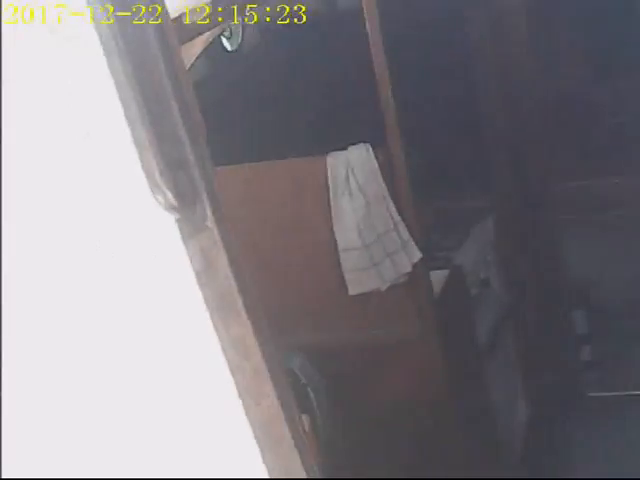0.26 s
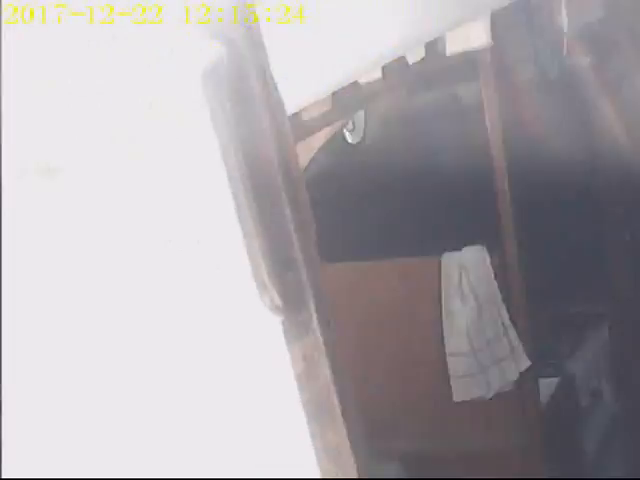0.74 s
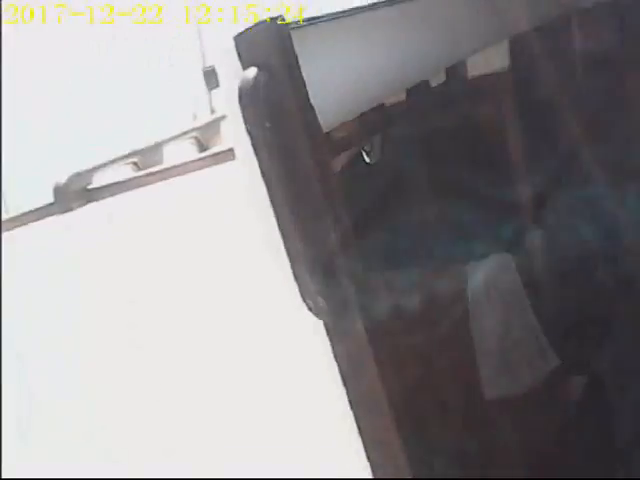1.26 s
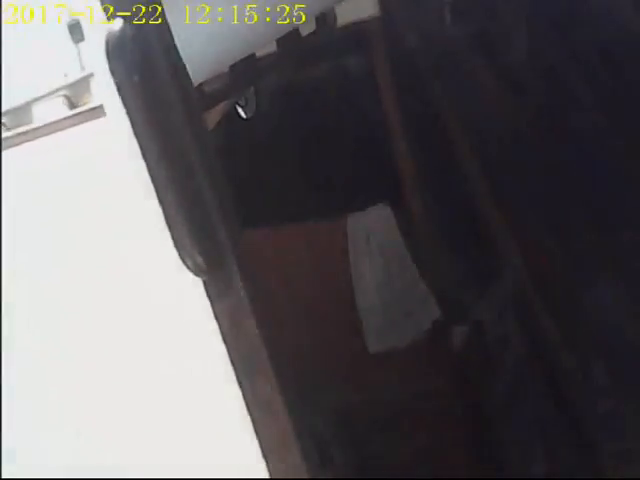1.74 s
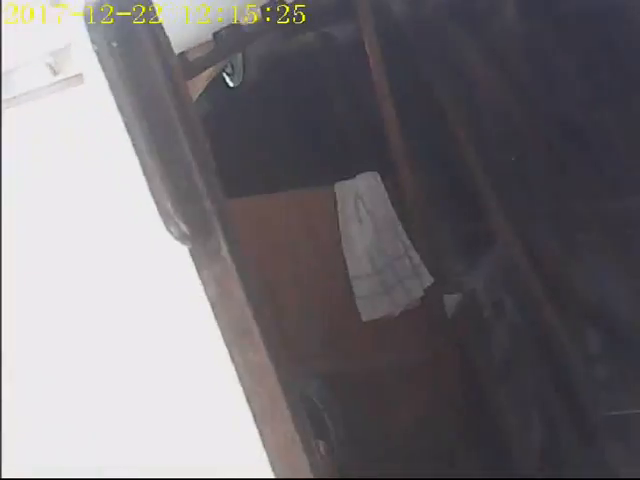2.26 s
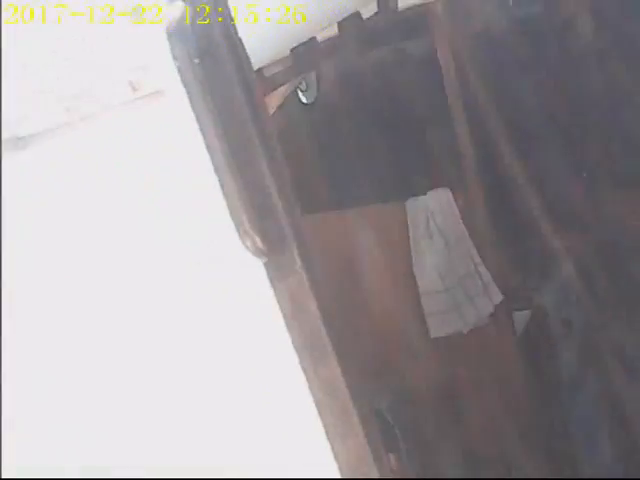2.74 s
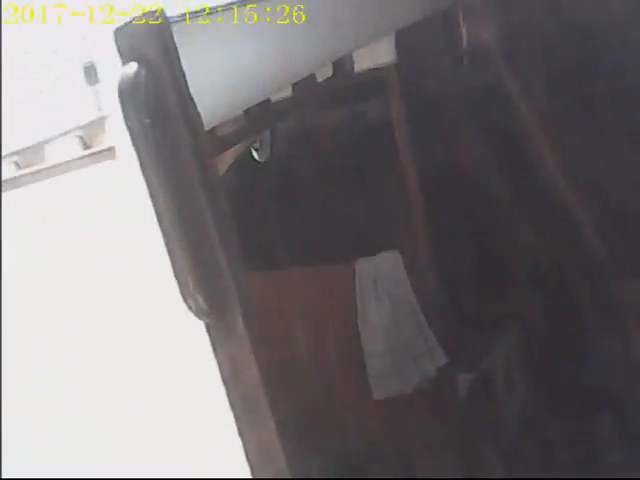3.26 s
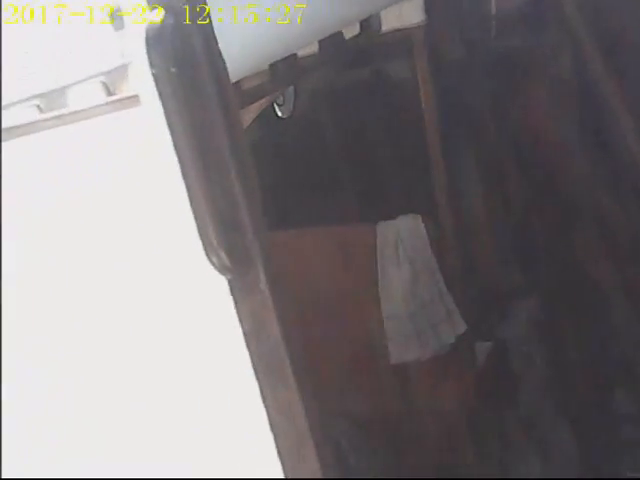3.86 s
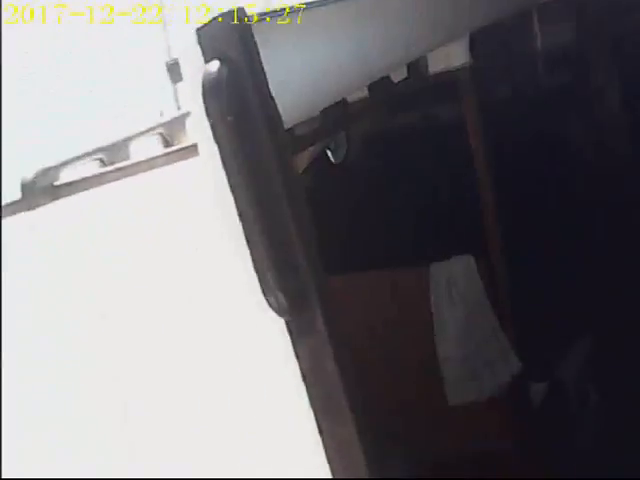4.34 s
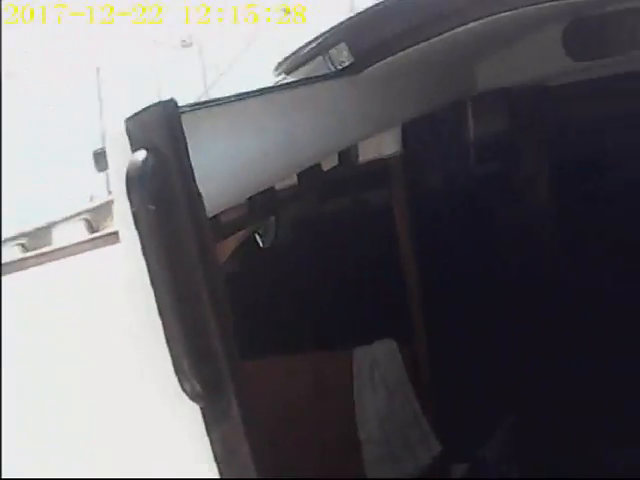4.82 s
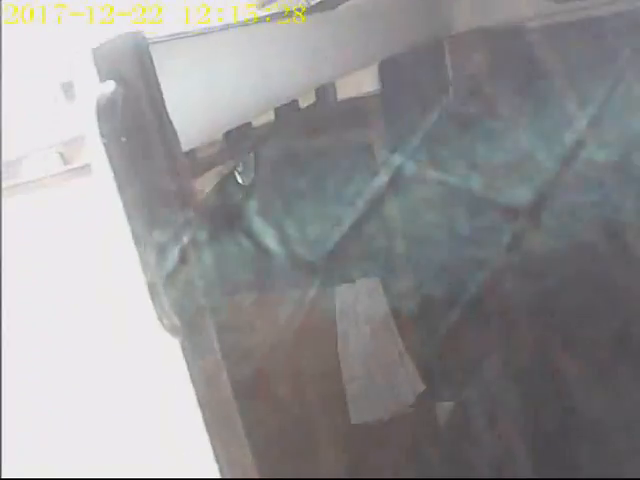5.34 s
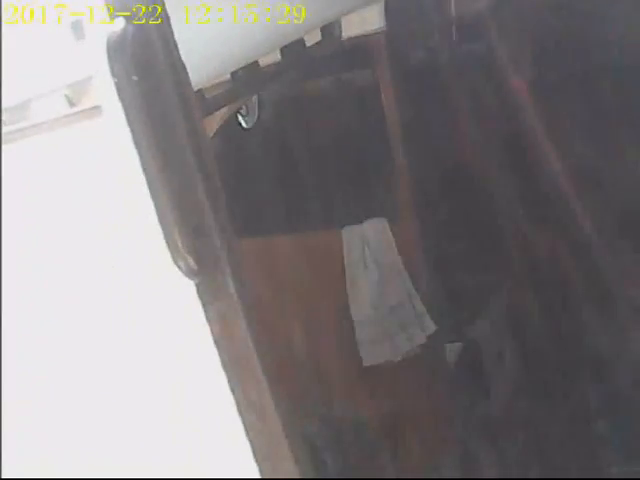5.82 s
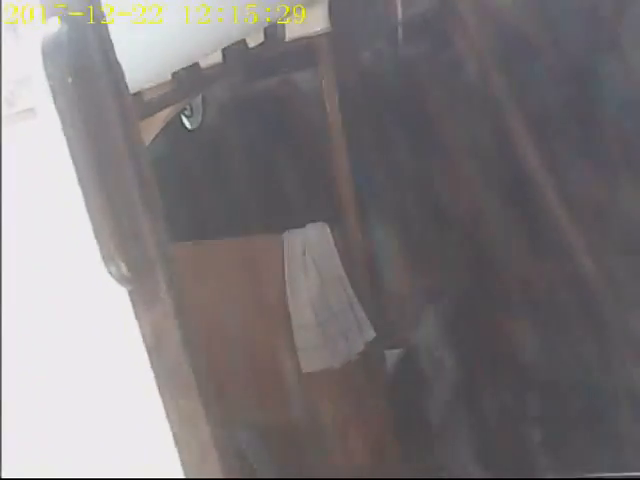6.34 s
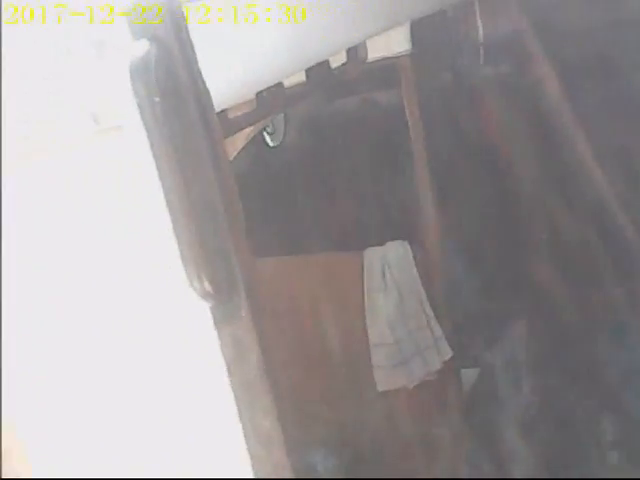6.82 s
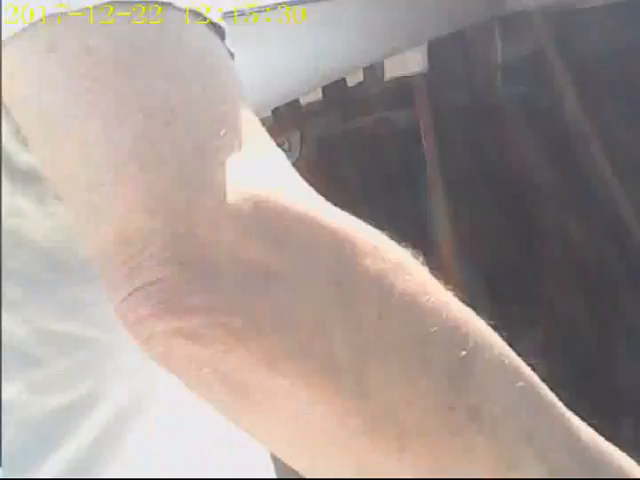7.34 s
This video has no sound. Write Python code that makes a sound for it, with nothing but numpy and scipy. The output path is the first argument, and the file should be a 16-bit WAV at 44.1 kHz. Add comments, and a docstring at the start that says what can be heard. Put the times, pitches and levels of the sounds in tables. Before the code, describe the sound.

A small boat diesel chugs steadily with hull hum and metallic rattle, light wind on the microphone, then hard buffeting gusts and brushing clothes near the end.

```python
"""A sailing boat's small diesel chugs along at slow speed, heard from the cockpit by a cheap camera.
The hull hums on multiples of the firing rate; noise shaped by each cycle gives clatter and metal rattle.
Light wind touches the microphone, then buffets it hard as someone moves in close: filtered noise in
gusts, with pressure bumps for the largest eddies. Clothes brush and a fitting clicks now and then, as
short noise bursts over faint hiss. The camera's low sample rate mirrors the sound into the treble."""
import sys
import numpy as np
from scipy import signal
from scipy.fft import rfft, irfft, next_fast_len
from scipy.io import wavfile

SR = 44100
rng = np.random.default_rng(int(sys.argv[2]) if len(sys.argv) > 2 else 0)


def wrap_up_sound(samples):
    """Save the sound to the file named by the first command line argument, as 16-bit audio."""
    columns = np.atleast_2d(samples).T
    # keep every value between -1 and 1, then stretch to whole-number steps
    tamed = np.clip(columns, -1, 1)
    steps = np.round(tamed * 32767).astype(np.int16)
    wavfile.write(sys.argv[1], SR, steps)


N = 334278
TIME_S = np.arange(N) / SR
BINS_HZ = np.fft.rfftfreq(8192, 1 / SR)


def amp(db):
    """Decibels to gain."""
    return 10 ** (np.asarray(db) / 20)


def unit(x):
    """Scales to rms 1."""
    return x / np.sqrt(np.mean(x ** 2) + 1e-20)


def read(points, hz):
    """Interpolates a dB spectrum on a log-frequency axis."""
    f, db = np.transpose(points)
    return np.interp(np.log(hz + 1), np.log(f + 1), db)


def lift(resonances, at_hz):
    """The dB that a set of resonances adds at each frequency."""
    return sum(db / (1 + (2 * (at_hz - hz) / width_hz) ** 2) for hz, width_hz, db in resonances)


def colour(x, db):
    """Minimum-phase filter from dB per bin, so resonances ring after what strikes them; rms 1."""
    log_gain = np.log(amp(np.concatenate([db, db[-2:0:-1]])))
    spectrum = np.exp(np.conj(signal.hilbert(log_gain)))
    response = np.fft.ifft(spectrum).real[:len(db)]
    return unit(signal.oaconvolve(x, response)[:N])


def white():
    """Gaussian white noise, rms 1."""
    return rng.standard_normal(N)


def wander(hz):
    """Slow random signal up to about hz; rms 1."""
    size = next_fast_len(N)
    smooth = np.exp(-(np.fft.rfftfreq(size, 1 / SR) / hz) ** 2)
    return unit(irfft(rfft(white(), size) * smooth, size)[:N])


def envelope(start_s, hold_s, rise_s, fall_s):
    """Straight attack, then exponential release once hold_s has passed since the start."""
    age_s = np.maximum(TIME_S - start_s, 0)
    release = np.exp(-np.clip((age_s - hold_s) / fall_s, 0, 20))
    return np.minimum(age_s / rise_s, 1) * release


# mean firing rate; time of one reference firing
FIRING_HZ, FIRING_S = 13.205, 0.0935


def crank(hunt_turns=0.0029, hunt_hz=2.47):
    """Engine cycles (one firing each) counted at each sample; the speed hunts very slightly."""
    return FIRING_HZ * (TIME_S - FIRING_S) + hunt_turns * wander(hunt_hz)


# hull resonances and the hollows between them: (frequency [Hz], width [Hz], lift [dB])
HULL_RESONANCES = [(106, 12, 12), (138, 20, -8), (227, 18, 12), (264, 8, 9.5), (292, 16, -6), (331, 10, 5),
                   (370, 30, -5), (431, 24, 11), (475, 10, 6), (581, 14, 5), (948, 20, 5)]
# rms of the lowest line before hull lift and waver; slope of the higher lines
DRONE_DB, DRONE_DB_PER_OCTAVE = -39.3, -5.7


def drone(turns, waver_db=2.6):
    """The hull hums on firing-rate multiples, most near its resonances; each line's level wavers."""
    out = np.zeros(N)
    moments_s = np.linspace(0, TIME_S[-1], 40)
    for k in range(2, 74):
        db = DRONE_DB + DRONE_DB_PER_OCTAVE * np.log2(k / 2) + lift(HULL_RESONANCES, k * FIRING_HZ)
        wavering_db = db + waver_db * rng.standard_normal(len(moments_s))
        level = np.interp(TIME_S, moments_s, amp(wavering_db))
        out += level * np.sqrt(2) * np.cos(2 * np.pi * (k * turns + rng.random()))
    return out


# dull engine clatter through the cabin: (frequency [Hz], relative level [dB per Hz])
CLATTER_SPECTRUM = [(20, 3.5), (70, 8.5), (140, 0.5), (250, 3), (360, -9), (450, -2), (700, -12.5),
                    (920, -7), (1150, -16), (1600, -16), (3000, -19), (5000, -36.5), (8000, -52)]
CLATTER_NOISE_DB = -39  # before the swell


def clatter(turns, repeat_gain=0.16, throb_db=2.5, lag_turns=0.32):
    """Dull cabin noise that swells after each firing; part of it repeats from cycle to cycle."""
    orders = np.arange(22, 110)
    cycle = np.linspace(0, 1, 2048)
    phases = rng.random((len(orders), 1))
    partials = np.cos(2 * np.pi * (orders[:, None] * cycle + phases))
    shape = amp(read(CLATTER_SPECTRUM, orders * FIRING_HZ)) @ partials
    repeating = unit(np.interp(turns % 1, cycle, shape))
    noise = colour(white(), read(CLATTER_SPECTRUM, BINS_HZ))
    swell = amp(throb_db * np.cos(2 * np.pi * (turns - lag_turns)))
    return amp(CLATTER_NOISE_DB) * swell * (noise + repeat_gain * repeating)


# bright metal rattle: (frequency [Hz], relative level [dB per Hz])
RATTLE_SPECTRUM = [(300, -26), (900, 9), (1300, 6.5), (1600, -9.5), (2100, 8), (2750, 3.5), (3100, -11),
                   (3600, -11.5), (4400, -1), (5000, -22), (6300, -34), (8000, -11.5)]
# ringing of the engine's metal at full share: (frequency [Hz], width [Hz], lift [dB])
METAL_RINGS = [(2386, 40, 14.5), (2535, 69, 3.5), (2633, 120, 12), (3954, 150, 14)]
# blows in each cycle: (delay after firing [s], relative level [dB], decay [s], ringing share [0-1])
CYCLE_BLOWS = [(.0015, -5, 0.0024, 0.9), (.008, -3.5, 0.0086, 1), (0.059, -6.5, 0.019, .9)]
# cycles whose first blow has a set strength: (time [s], extra level [dB])
HARD_FIRINGS = [(1.15, 8), (1.76, 11.5), (2.74, 7), (3.35, 1), (3.65, 6), (4.41, 7.5), (4.49, 10.5),
                (4.86, 9.5)]
RATTLE_RMS_DB = -51


def rattle(turns, uneven_db=0.9, jitter_s=0.00047, grit_db=2.0):
    """Combustion knock and valve gear strike the metal in every cycle, never quite alike."""
    ring_db = lift(METAL_RINGS, BINS_HZ)
    force_db = uneven_db * rng.standard_normal(size=(len(CYCLE_BLOWS), 128))
    for time_s, extra_db in HARD_FIRINGS:
        force_db[0, round(np.interp(time_s, TIME_S, turns))] = extra_db
    out = np.zeros(N)
    for (delay_s, db, decay_s, ringing), cycle_db in zip(CYCLE_BLOWS, force_db):
        place = turns - FIRING_HZ * (delay_s + jitter_s * wander(3.0))
        age_s = (place % 1) / FIRING_HZ
        blows = amp(db + cycle_db[np.floor(place).astype(int)]) * np.exp(-age_s / decay_s)
        shaking = blows * white() * amp(grit_db * wander(350))
        # colour() normalises, so the blow strength is restored here
        out += np.std(blows) * colour(shaking, read(RATTLE_SPECTRUM, BINS_HZ) + ringing * ring_db)
    return amp(RATTLE_RMS_DB) * unit(out)


# gusts, flutter before trim:
# (start [s], hold [s], rumble [dB], flutter [dB], tearing front peak [dB])
WIND_GUSTS = [(1.11, 0.1, -33, -47, -52), (1.744, 0.06, -33, -53, -56), (1.892, 0.12, -26.5, -41.5, -54),
              (5.283, 0.047, -29, -58, -51), (6.21, 0.064, -25, -44, -54), (6.308, 0.018, -25, -40, -46),
              (6.467, 0.0088, -13, -30.5, -19), (6.492, 0.11, -21.5, -33, -26),
              (6.593, 0.015, -18, -27, -21.5), (6.681, 0.09, -20.5, -27.5, -22.5),
              (6.766, 0.058, -20, -26, -34), (6.943, 0.012, -16, -31, -30.5),
              (6.969, 0.039, -31, -28.5, -35), (7.054, 0.037, -27, -25.5, -24.5),
              (7.268, 0.014, -19.5, -33, -25), (7.301, 0.052, -24, -28.5, -25.5),
              (7.396, 0.019, -29, -29.5, -24)]
# slow eddies: (frequency [Hz], relative level [dB per Hz])
RUMBLE_SPECTRUM = [(8, -10.5), (25, 2), (65, -0.5), (115, -5.5), (170, -6), (250, -10.5), (450, -25.5),
                   (1000, -37), (3000, -65)]
# fine turbulence: (frequency [Hz], relative level [dB per Hz])
FLUTTER_SPECTRUM = [(80, -3.5), (230, 7), (420, 4), (600, -0.5), (780, -2.5), (1150, -9.5), (1400, -10.5),
                    (1900, -20.5), (3000, -27.5), (5000, -54), (8000, -43)]
# steady breeze before freshening (flutter also before trim)
BREEZE_RUMBLE_DB, BREEZE_FLUTTER_DB = -39, -51
# the breeze freshens once and stays strong
FRESHEN_S, FRESHEN_RISE_S, FRESHEN_RUMBLE_DB, FRESHEN_FLUTTER_DB = 6.39, 0.098, 13.5, 13
RUMBLE_RISE_S, RUMBLE_FALL_S, FLUTTER_RISE_S, FLUTTER_FALL_S = 0.013, 0.011, 0.0047, 0.015
FRONT_PEAK_S = 0.0029


def wind(lumpy_db=1.36, ragged_db=2.5, flutter_trim_db=0.55, tearing_db_per_octave=2.5):
    """Slow eddies rumble, finer turbulence flutters raggedly; gusts with tearing fronts ride on both."""
    fresh = .5 + .5 * np.tanh((TIME_S - FRESHEN_S) / FRESHEN_RISE_S)
    low = amp(BREEZE_RUMBLE_DB + FRESHEN_RUMBLE_DB * fresh)
    high = amp(BREEZE_FLUTTER_DB + FRESHEN_FLUTTER_DB * fresh)
    fronts = np.zeros(N)
    for start_s, hold_s, low_db, high_db, front_db in WIND_GUSTS:
        low_gust = amp(low_db) * envelope(start_s, hold_s, RUMBLE_RISE_S, RUMBLE_FALL_S)
        high_gust = amp(high_db) * envelope(start_s, hold_s, FLUTTER_RISE_S, FLUTTER_FALL_S)
        low, high = np.hypot(low, low_gust), np.hypot(high, high_gust)
        u = np.clip((TIME_S - start_s) / FRONT_PEAK_S, 0, 20)
        fronts += amp(front_db) * u * np.exp(1 - u)
    rumble = colour(white() * amp(lumpy_db * wander(30)), read(RUMBLE_SPECTRUM, BINS_HZ))
    flutter_spectrum_db = read(FLUTTER_SPECTRUM, BINS_HZ)
    flutter = colour(white() * amp(ragged_db * wander(150)), flutter_spectrum_db)
    # faster air sheds finer eddies, so fronts are brighter
    octaves = np.log2(np.clip(BINS_HZ, 300, 1700) / 300)
    tearing = colour(white(), flutter_spectrum_db + tearing_db_per_octave * octaves)
    return low * rumble + amp(flutter_trim_db) * high * flutter + fronts * tearing


# largest eddies on the microphone: (time [s], peak level [dB], width scale [s])
EDDY_POPS = [(2.034, -16.5, 0.0017), (6.328, -13.5, 0.0018), (6.512, -13, 0.0021), (6.551, -12.5, 0.003),
             (6.773, -14.5, .001), (6.799, -16, 0.0023), (6.918, -13.5, 0.0014), (6.983, -14, 0.0012),
             (7.282, -9.5, 0.0016), (7.345, -21, 0.00067)]


def pops(sharpness=1.46, rebound=0.5):
    """Each strong eddy is one pointed pressure bump with a shallow, five times wider rebound."""
    out = np.zeros(N)
    for time_s, db, width_s in EDDY_POPS:
        u = (TIME_S - time_s) / width_s
        bump = (1 + u ** 2) ** -sharpness
        dip = (1 + (u / 5) ** 2) ** -sharpness
        out += amp(db) * (bump - rebound * dip) / (1 - rebound)
    return out


# strokes of clothes nearby: (time [s], peak level [dB], half length to 1/e [s])
CLOTH_STROKES = [(6.24, -47, 0.053), (6.998, -45.5, 0.032), (7.195, -50, .062), (7.477, -42, 0.037),
                 (7.553, -40, 0.024)]
# cloth noise: (frequency [Hz], relative level [dB per Hz])
CLOTH_SPECTRUM = [(300, -31), (1000, -4.5), (1700, -4), (2400, -3.5), (3200, -13.5), (4200, -18.5),
                  (6000, -37), (8000, -29)]


def clothes(grain_db=2.0):
    """Cloth slides in soft, grainy strokes of noise."""
    strokes = sum(amp(db) * np.exp(-((TIME_S - time_s) / length_s) ** 2)
                  for time_s, db, length_s in CLOTH_STROKES)
    return strokes * colour(white() * amp(grain_db * wander(190)), read(CLOTH_SPECTRUM, BINS_HZ))


# snaps of a fitting: (time [s], level before echo [dB], decay [s])
FITTING_CLICKS = [(3.1003, -33.5, .0055), (5.716, -45, .004), (6.3, -47, .004)]
# snap noise: (frequency [Hz], relative level [dB per Hz])
CLICK_SPECTRUM = [(300, -10), (1050, 3), (1700, -3), (2300, -2), (3100, -4), (4100, 1), (4900, -3),
                  (5600, 0), (6600, -11), (8000, -15)]


def clicks(echo_gain=0.022, echo_decay_s=0.034):
    """Hard snaps of decaying noise, with a weaker, slower decay for the cockpit's short echo."""
    fade = np.zeros(N)
    for time_s, db, decay_s in FITTING_CLICKS:
        age_s = np.maximum(TIME_S - time_s, 0)
        decay = np.exp(-age_s / decay_s) + echo_gain * np.exp(-age_s / echo_decay_s)
        fade += amp(db) * (TIME_S > time_s) * decay
    return fade * colour(white(), read(CLICK_SPECTRUM, BINS_HZ))


def hiss(level_db=-57):
    """Steady white background noise."""
    return amp(level_db) * white()


def scene():
    """Engine, wind, clothes, fittings and hiss at one microphone."""
    turns = crank()
    engine = drone(turns) + clatter(turns) + rattle(turns)
    mix = engine + wind() + pops() + clothes() + clicks() + hiss()
    return mix[None]


CAMERA_RATE_HZ, BAND_LIMIT_HZ = 16000, 15760


def record(dry):
    """The camera samples slowly and holds each value, mirroring sound into the treble; then a low-pass."""
    slow = signal.resample_poly(dry, CAMERA_RATE_HZ, SR, axis=1, window=("kaiser", 4))
    held = slow[:, np.arange(N) * CAMERA_RATE_HZ // SR]
    low_pass = signal.firwin(1023, BAND_LIMIT_HZ, window=("kaiser", 9), fs=SR)
    return signal.oaconvolve(held, low_pass[None], "same")


dry = scene()
out = record(dry)
wrap_up_sound(out)
```